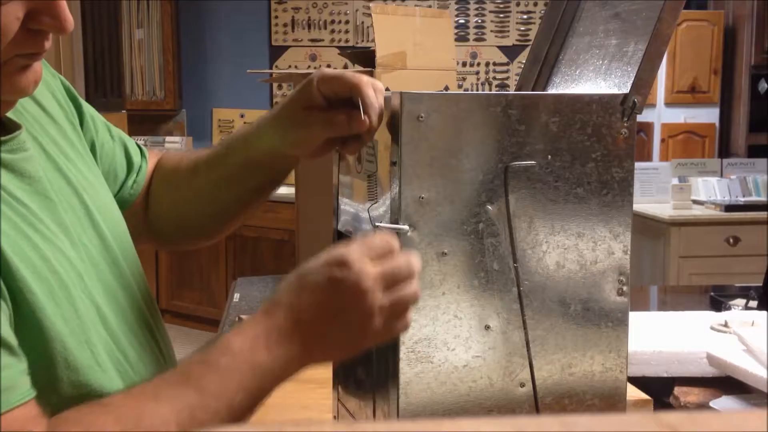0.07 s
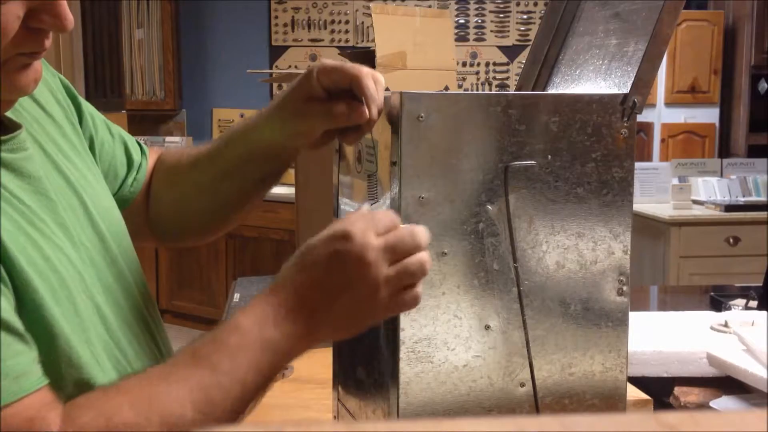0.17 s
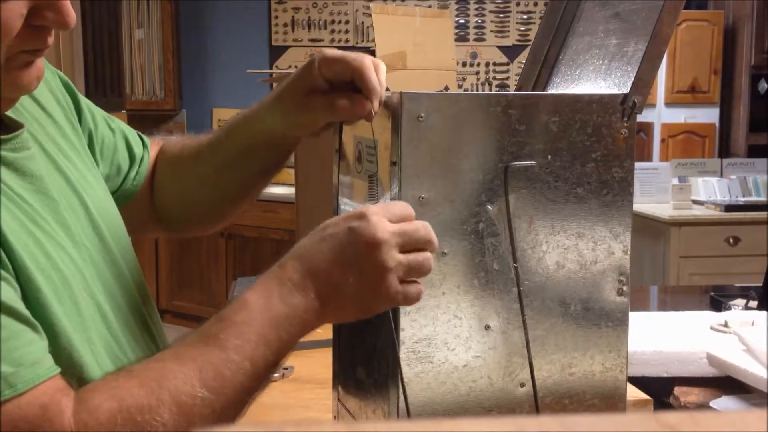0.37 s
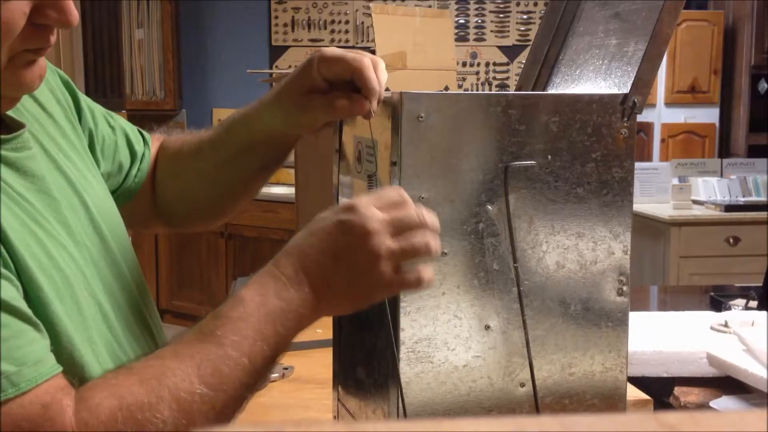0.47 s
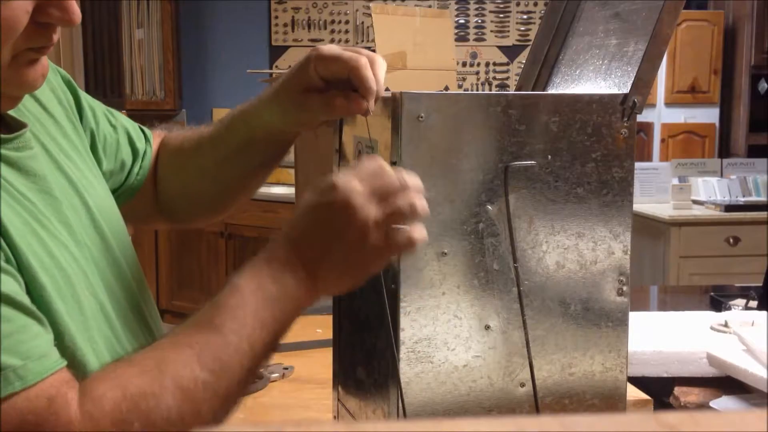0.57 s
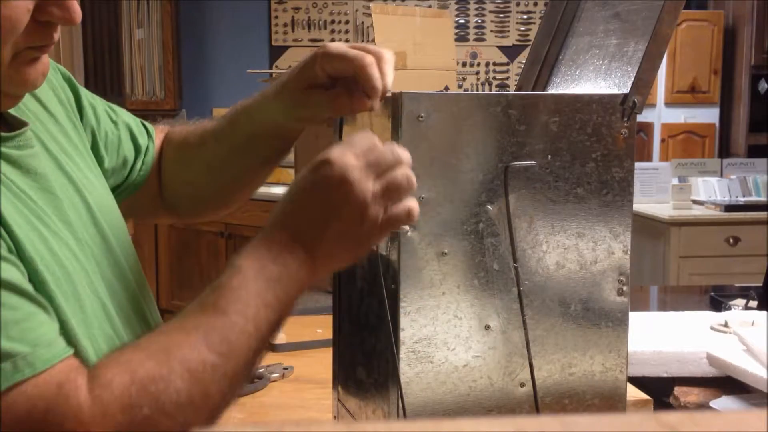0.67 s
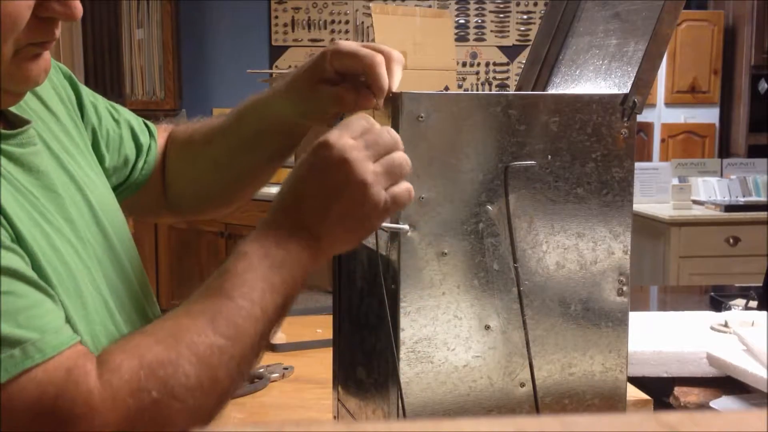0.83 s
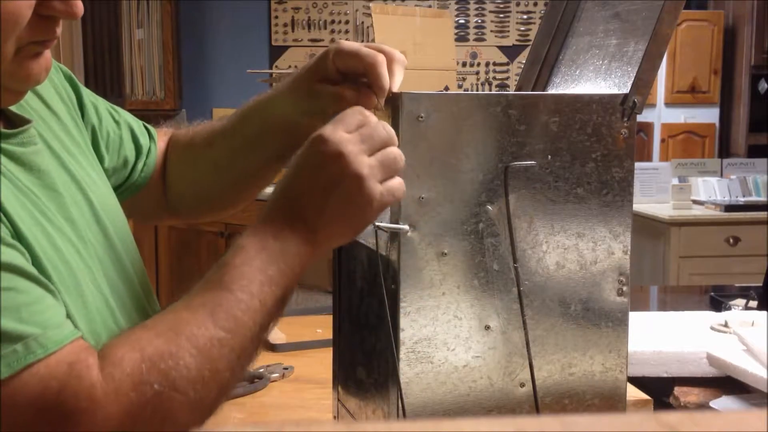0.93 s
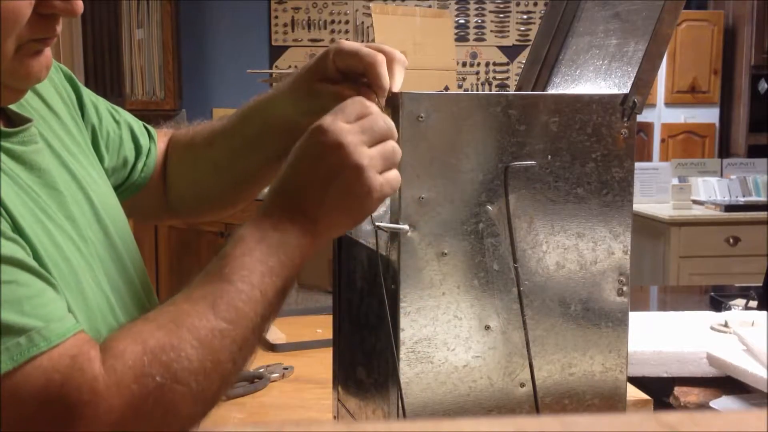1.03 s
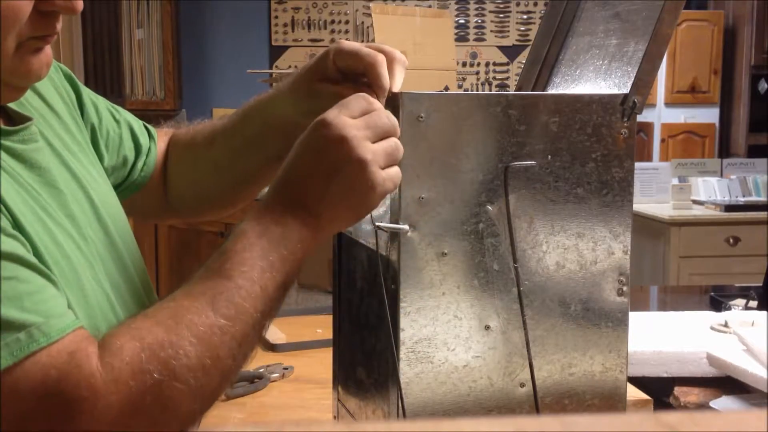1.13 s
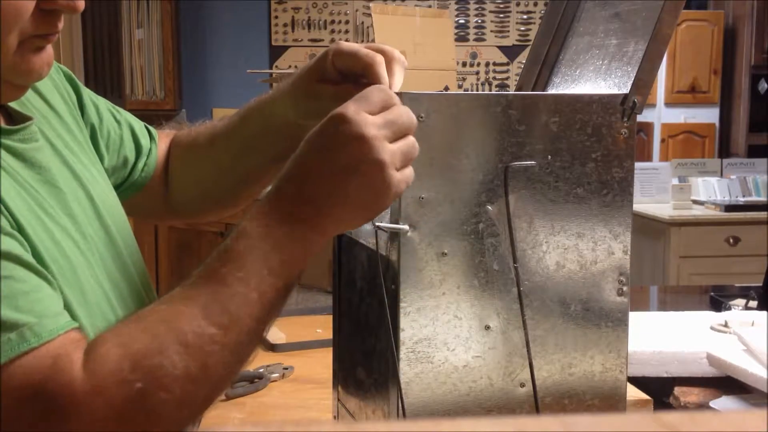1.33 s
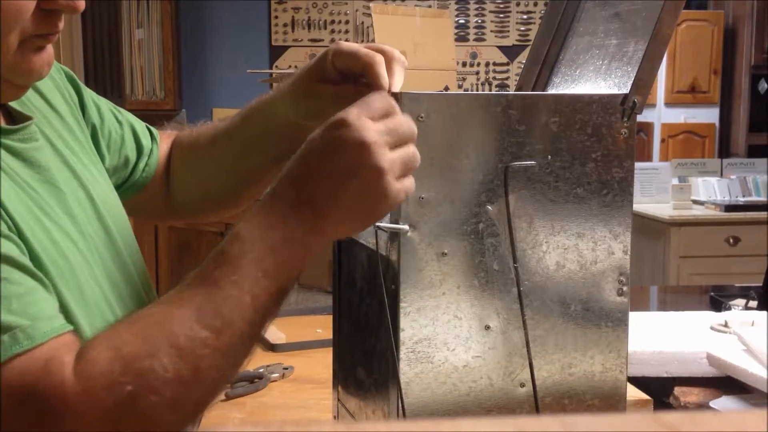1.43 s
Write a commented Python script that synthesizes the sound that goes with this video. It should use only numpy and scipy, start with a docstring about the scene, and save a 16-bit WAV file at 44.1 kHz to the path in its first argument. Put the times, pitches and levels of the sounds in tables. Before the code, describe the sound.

Two sharp sheet-metal clacks stand out, a bright one at about 0.3 seconds and a heavier one at 0.45, each ringing briefly. From the start until about 1 second, hands and a wire spring softly bump and scrape the metal box, and a flexing panel hums low. A faint hollow rub comes at 1.3 seconds. The small room adds a short reverberation and faint hiss.

```python
"""A sheet-metal feeder on a workshop table, with hands hooking a spring onto it.
The metal snaps over with a bright clack and drops back with a heavier one; each sets the panels ringing.
Around them, hand and spring bump the case, a side panel flexes and hums, and the wire scrapes;
last, the spring rubs along the hollow case. One microphone, across a small live room, with a faint hiss."""
import sys
import numpy as np
from scipy import signal
from scipy.fft import rfft, irfft
from scipy.io import wavfile

SR = 44100
rng = np.random.default_rng(int(sys.argv[2]) if len(sys.argv) > 2 else 0)


def transcribe(signal):
    """Save signal, clipped to [-1, 1], as a 16-bit WAV file at the path in sys.argv[1]."""
    frames = np.atleast_2d(signal).T
    limited = np.clip(frames, -1, 1)
    pcm = np.round(limited * 32767).astype(np.int16)
    wavfile.write(sys.argv[1], SR, pcm)


N = 66150

# steady hiss at the microphone: frequency_hz, level_db
HISS_SPECTRUM = [(25, -23), (70, -12), (140, 13.5), (400, 10), (900, 2), (2000, 0), (5000, -4),
                 (10000, -10), (15000, -5.5)]
# hand and spring bumping the case, and at 0.496 s the metal rebounding after the second clack: start_s,
# level_db, bass_db, treble_db, t60_at_1khz_s, push_rise_s
BUMP_BLOWS = [(0.0, -47, -0.5, 3.5, 0.5, 0.00033), (0.066, -53, -13, -4, 1, 0.0037),
              (0.124, -59.5, 5, -2, 0.37, 0.0049), (0.197, -43.5, -1, -3, 0.26, 0.0084),
              (0.214, -42.5, -17, -5.5, 0.15, 0.0033), (0.248, -54, 15.5, 11, 0.14, .006),
              (0.286, -44, 0, -2, 0.37, 0.009), (0.496, -36, -12, 4, 0.1, 0.0026),
              (0.553, -44.5, -2, 12, 0.12, .012), (0.606, -50, 7.5, -26, 0.092, 0.0034),
              (0.794, -63, 9, 12, 0.13, 0.0096), (0.905, -56.5, 3, 5, 0.28, 0.024)]
# the case under a soft bump: frequency_hz, level_db
BUMP_SPECTRUM = [(40, -42), (80, -32), (130, 0), (230, -2.5), (450, 1.5), (850, -9), (1500, -15),
                 (2400, -18), (2900, -18), (4000, -25), (15000, -39.5)]
# reverberation of the small room: frequency_hz, t60_s, level_re_blow_db
ROOM_REVERB = [(133, 0.76, -6.5), (395, 0.89, -2.5), (1250, 0.63, 2), (3080, 0.41, -0.5),
               (7000, 0.37, -3.5), (13900, 0.27, -20)]
# the side panel flexing under the hand: start_s, lower_mode_db, upper_mode_db
PANEL_FLEXES = [(0.0, -76, -47.5), (0.21, -49, -44), (0.564, -41.5, -50), (0.605, -47.5, -55),
                (0.784, -68, -50.5), (0.957, -59.5, -53.5)]
# strokes of the spring's wire: middle_s, half_length_s, level_db
WIRE_STROKES = [(0.008, 0.019, -58.5), (0.17, 0.036, -70.5), (0.271, 0.023, -61), (0.428, 0.024, -55),
                (0.846, 0.042, -78), (0.972, 0.033, -68), (1.328, 0.051, -75)]
# the scraping wire: frequency_hz, level_db
WIRE_SPECTRUM = [(300, -34), (1200, 10), (2800, 4), (5500, -3), (9000, -0.5), (15000, -16)]
# the metal snapping over, then back: start_s, level_db, bass_db, treble_db, t60_at_1khz_s, push_rise_s
CLACK_BLOWS = [(0.3202, -29.5, -3, -2.5, 0.29, 0.0012), (0.4516, -30.5, -3.5, -5, 0.65, 0.00052)]
# first contact of metal on metal: frequency_hz, level_db
SNAP_SPECTRUM = [(60, -60), (400, -13), (1300, -8), (3200, 5), (3800, -1), (4600, -1), (6000, -13),
                 (15000, -10)]
# crowded modes of the sheet: frequency_hz, level_db
SHEET_SPECTRUM = [(40, -43), (80, -29), (115, -20.5), (160, -4.5), (230, -1.5), (330, -2), (450, -0.5),
                  (800, -8), (1400, -8), (1700, -8), (1890, -11.5), (2180, -7), (2450, -13.5), (3000, -7),
                  (3350, -8), (3750, -13), (4500, -9.5), (5700, -16), (8500, -14.5), (9400, -17),
                  (11800, -18), (15500, -28.5)]
# strongest modes of panels and spring: pitch_hz, first_clack_db, second_clack_db, t60_s
PANEL_MODES = [(150, -65, -47, .8), (206, -48, -36, .6), (233, -38, -34, .65), (281, -58, -43, .55),
               (316, -47, -44, .6), (344, -41, -43, .6), (420, -36, -33, .52), (478, -43, -56, .7),
               (515, -43, -39, .5), (561, -42, -44, .7), (668, -47, -38, .55), (888, -54, -44, .6),
               (1000, -56, -45, .55), (1349, -39, -44, .38), (1434, -42, -45, .5), (1768, -43, -49, .45),
               (2143, -43, -52, .27), (2583, -45, -61, .4), (2833, -65, -39, .38), (2912, -42, -51, .45),
               (3030, -60, -59, 1.0), (3261, -44, -51, .35), (3340, -52, -34, .08), (4045, -41, -58, .2),
               (4540, -53, -48, .3), (4814, -47, -59, .3), (8360, -51, -58, .25), (9020, -49, -68, .2)]
# hollow resonances of the rubbed case: pitch_hz, width_hz, level_db
CASE_RESONANCES = [(260, 95, -4), (406, 41, 3.5), (587, 45, -2.5), (803, 160, -4.5), (1380, 40, -4),
                   (1600, 59, -15.5), (3140, 60, -22), (4000, 100, -18)]

TIME_S, BIN_HZ = np.arange(N) / SR, np.arange(N // 2 + 1) * SR / N


def undb(db):
    """Decibels to gain."""
    return 10 ** (np.asarray(db) / 20)


def along(hz, table, column=1):
    """Read a table's column on a log-frequency scale."""
    table = np.array(table, float)
    return np.interp(np.log(np.maximum(hz, 1)), np.log(table[:, 0]), table[:, column])


def noise(spectrum):
    """Noise of rms 1 with a given spectrum."""
    coloured = irfft(rfft(rng.standard_normal(N)) * undb(along(BIN_HZ, spectrum)), N)
    return coloured / coloured.std()


def flutter(hz):
    """Smooth random wander with a spread near 1."""
    return np.interp(TIME_S * hz, np.arange(N), rng.standard_normal(N))


def crowded_modes(spectrum, count=27):
    """Close modes blur into noise: third-octave centres and a band for each, together of rms 1."""
    centres_hz = 40 * 2 ** (np.arange(count)[:, None] / 3)
    thirds_away = 3 * np.log2(np.maximum(BIN_HZ, 1) / centres_hz)
    gain = np.cos(np.clip(thirds_away, -1, 1) * np.pi / 2) * undb(along(BIN_HZ, spectrum))
    gain /= np.sqrt(np.mean(np.sum(gain ** 2, axis=0)))
    return centres_hz, irfft(rfft(rng.standard_normal((count, N))) * gain, N)


def blows(table, spectrum, hold_s=0.017, bass_build_s=0.007, room_build_s=0.028, treble_damping=0.27):
    """Each blow rings the crowded modes and fills the room; the bass builds slower and rings longer."""
    hz, bands = crowded_modes(spectrum)
    grid_s = TIME_S[::16]
    bass_shelf, treble_shelf = 1 / (1 + (hz / 450) ** 2), 1 / (1 + (3000 / hz) ** 2)
    build_s = bass_build_s / (1 + (hz / 586) ** 2)
    room_t60, room_db = along(hz, ROOM_REVERB), along(hz, ROOM_REVERB, column=2)
    power = 0
    for start, db, bass_db, treble_db, t60, push_s in table:
        age = np.maximum(grid_s - start, 0)
        strength = undb(db + bass_db * bass_shelf + treble_db * treble_shelf)
        rise = 1 - np.exp(-age / (push_s + build_s))
        fade = undb(-60 * np.maximum(age - hold_s, 0) / t60 * (hz / 1000) ** treble_damping)
        room_rise = 1 - np.exp(-age / (push_s + room_build_s))
        room_fade = undb(room_db - 60 * age / room_t60)
        power += strength ** 2 * ((rise * fade) ** 2 + (room_rise * room_fade) ** 2)
    return sum(band * np.interp(TIME_S, grid_s, level) for band, level in zip(bands, np.sqrt(power)))


def mode(start, hz, db, t60, rise_s):
    """One mode of the metal: it builds, wavers a little and dies away."""
    age = np.maximum(TIME_S - start, 0)
    rise = (1 - np.exp(-age / rise_s)) ** 2
    fade = undb(db + 1.8 * flutter(35) - 60 * age / t60)
    phase = 2 * np.pi * (hz * age + rng.random()) + 0.35 * flutter(30)
    return rise * fade * np.sin(phase)


def hiss(level_db=-67):
    """A faint, steady hiss lies under everything."""
    return undb(level_db) * noise(HISS_SPECTRUM)


def bumps():
    """Hand and spring knock softly on the case, the metal rebounds once after the second clack, and the room
    answers."""
    return blows(BUMP_BLOWS, BUMP_SPECTRUM)


def panel_hum(pitches_hz=(206, 231)):
    """The side panel flexes under the hand and hums in two close modes."""
    return sum(mode(start, hz, db, t60=0.5, rise_s=0.0061)
               for start, *levels_db in PANEL_FLEXES for hz, db in zip(pitches_hz, levels_db))


def scrapes(grit_db=3, grit_hz=270):
    """The wire drags over the edge in short gritty strokes."""
    level = sum(undb(db) / (1 + ((TIME_S - middle) / half_length) ** 4)
                for middle, half_length, db in WIRE_STROKES)
    return level * noise(WIRE_SPECTRUM) * undb(grit_db * flutter(grit_hz))


def clacks(snap_db=-31, snap_t60_s=0.012):
    """Metal meets metal with a hard, bright snap, and the whole sheet clatters into the room."""
    snap_level = sum((TIME_S >= start) * undb(snap_db - 60 * np.abs(TIME_S - start) / snap_t60_s)
                     for start, *_ in CLACK_BLOWS)
    return snap_level * noise(SNAP_SPECTRUM) + blows(CLACK_BLOWS, SHEET_SPECTRUM)


def panel_ring(bass_build_s=0.0037):
    """The strongest single modes ring on after each clack, the low ones building more slowly."""
    return sum(mode(start, hz, db, t60, rise_s=bass_build_s / (1 + hz / 1000))
               for hz, *levels_db, t60 in PANEL_MODES for (start, *_), db in zip(CLACK_BLOWS, levels_db))


def rub(start_s=1.284, length_s=0.06, rise_s=0.04, t60_s=0.48, level_db=-57):
    """The spring drags along the case, swelling in its hollow resonances and fading into the room."""
    body_power = sum(undb(db) ** 2 / (1 + (2 * (BIN_HZ - hz) / width) ** 2) ** 1.3
                     for hz, width, db in CASE_RESONANCES)
    low_cut = BIN_HZ ** 2 / (BIN_HZ ** 2 + 150 ** 2)
    hollow = irfft(rfft(rng.standard_normal(N)) * np.sqrt(body_power) * low_cut, N)
    age = np.maximum(TIME_S - start_s, 0)
    rise = 1 - np.exp(-age / rise_s)
    fade = undb(level_db - 60 * np.maximum(age - length_s, 0) / t60_s)
    return rise * fade * hollow / hollow.std()


def scene():
    """The feeder as heard from across the room, in mono."""
    return (hiss() + bumps() + panel_hum() + scrapes() + clacks() + panel_ring() + rub())[None]


def record(dry):
    """The recorder cuts the top steeply above 15.3 kHz."""
    return signal.sosfilt(signal.ellip(10, 0.2, 70, 15300, fs=SR, output="sos"), dry)


dry = scene()
out = record(dry)
transcribe(out)
```